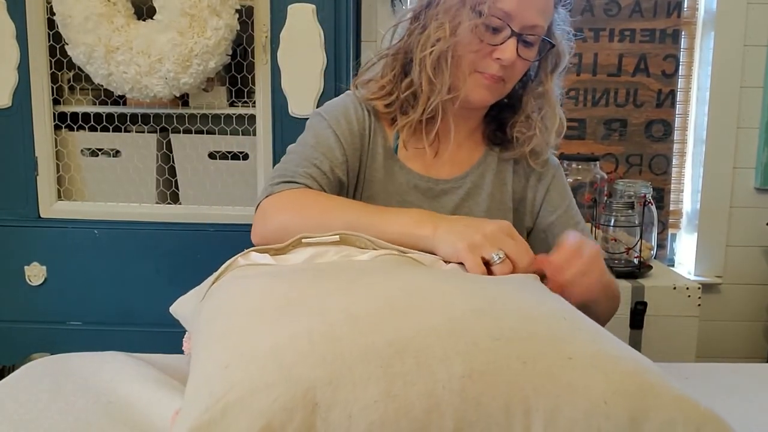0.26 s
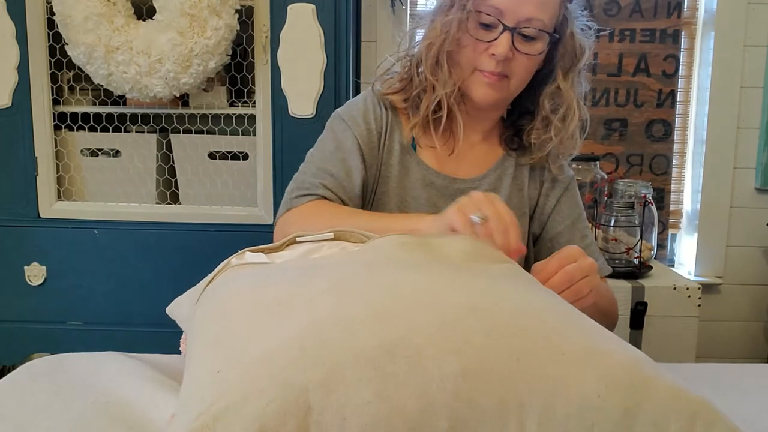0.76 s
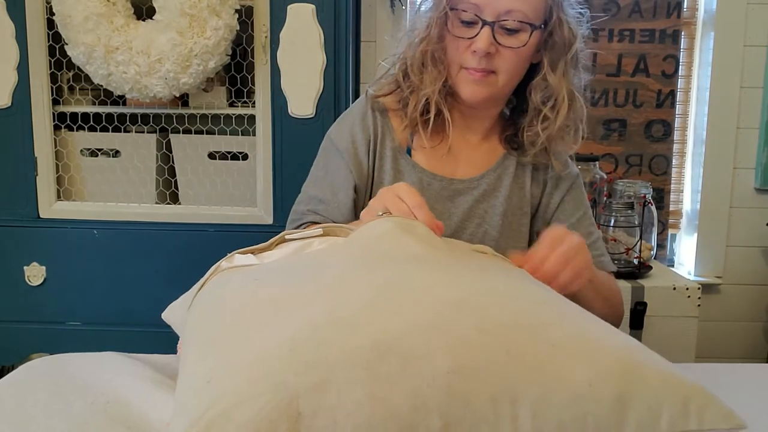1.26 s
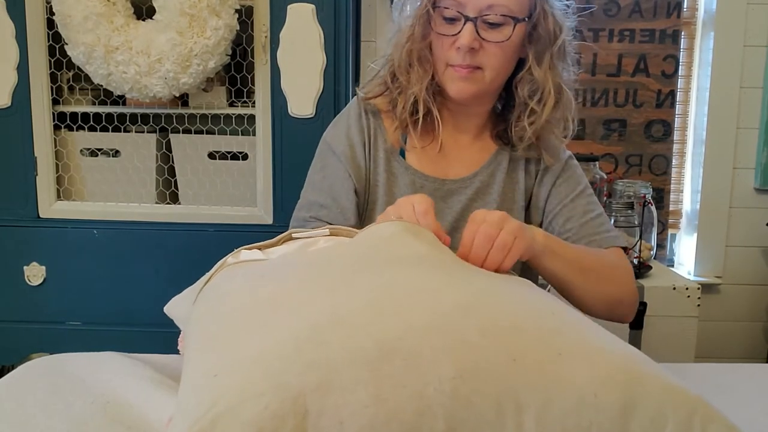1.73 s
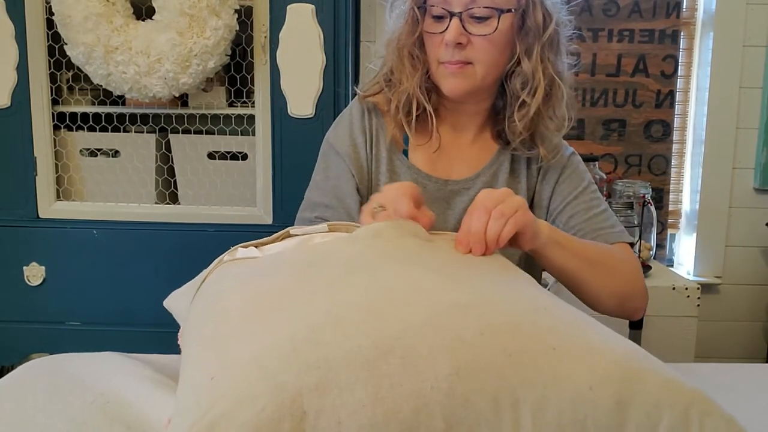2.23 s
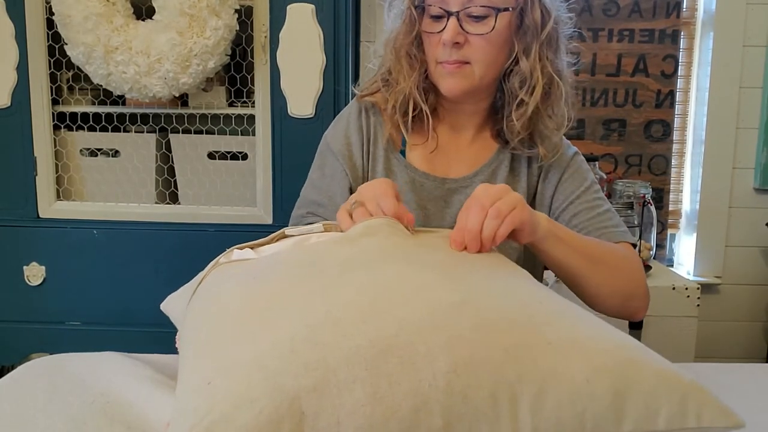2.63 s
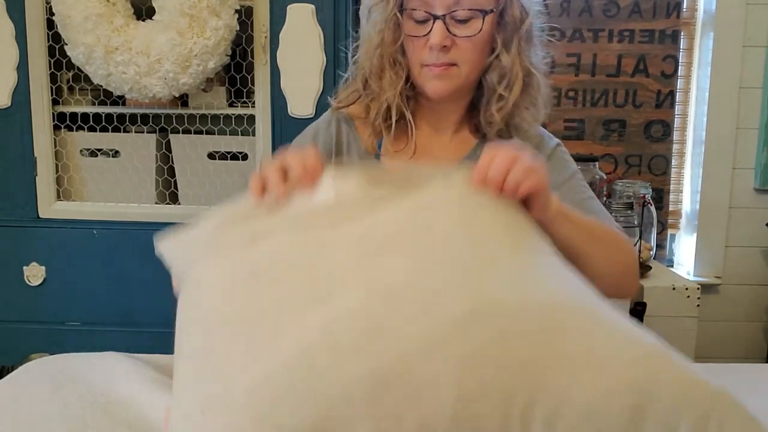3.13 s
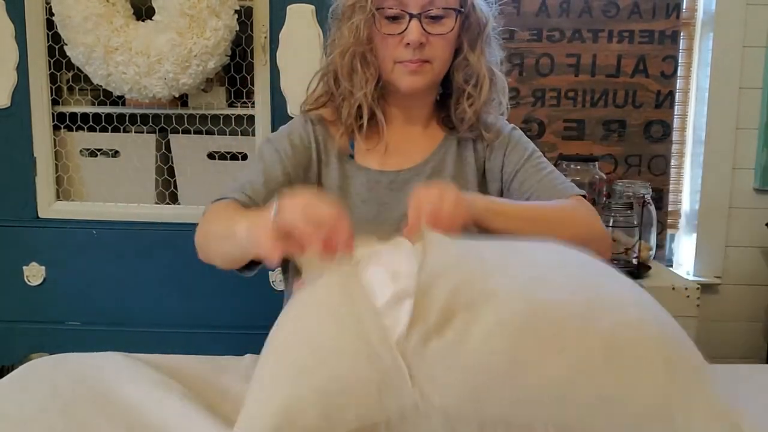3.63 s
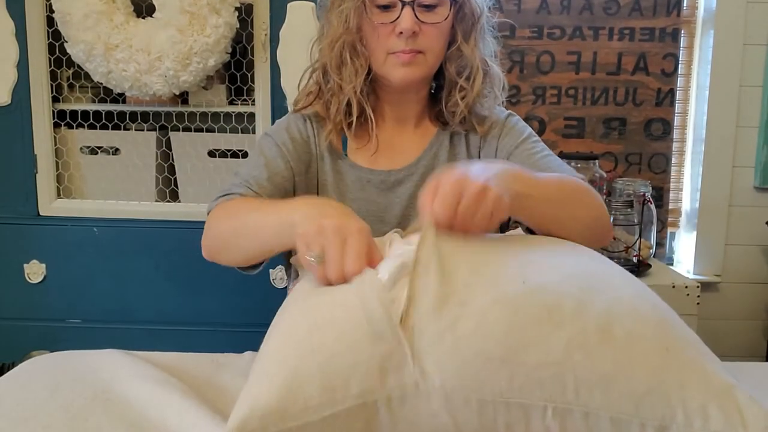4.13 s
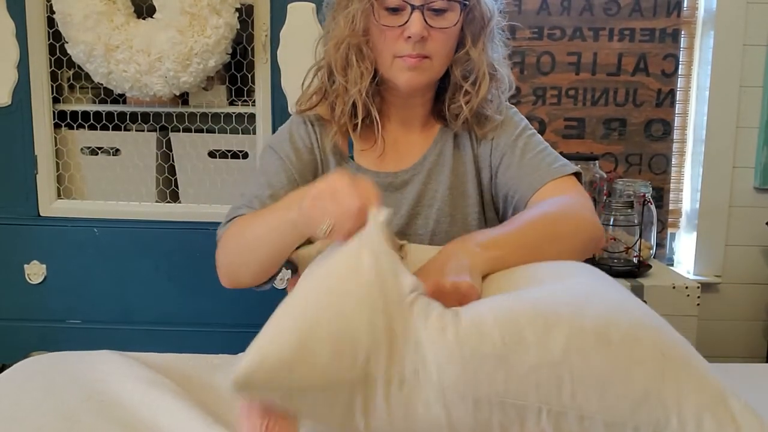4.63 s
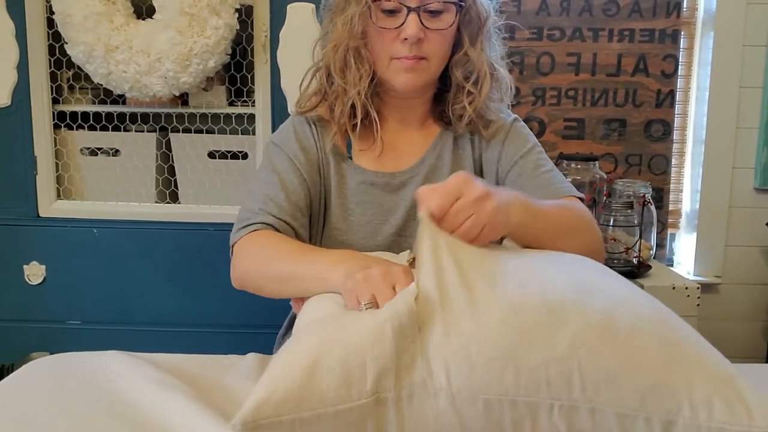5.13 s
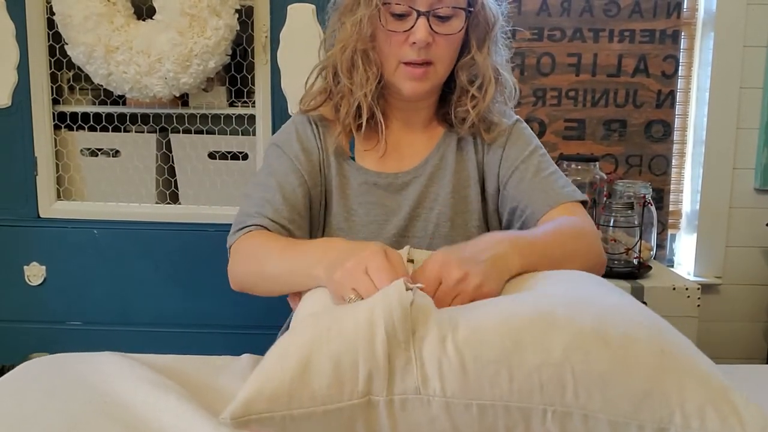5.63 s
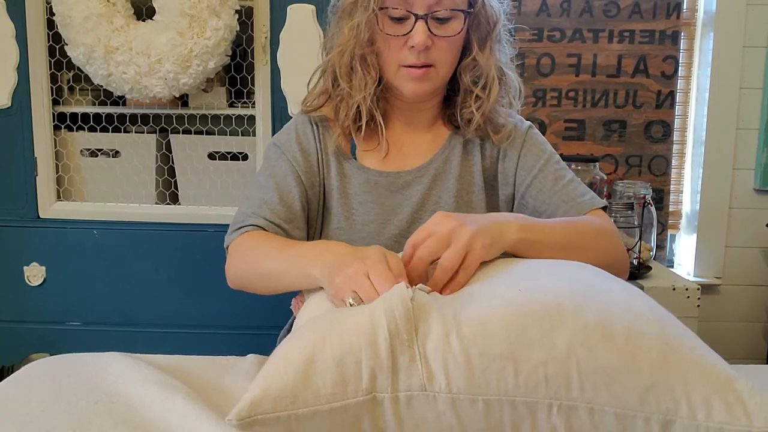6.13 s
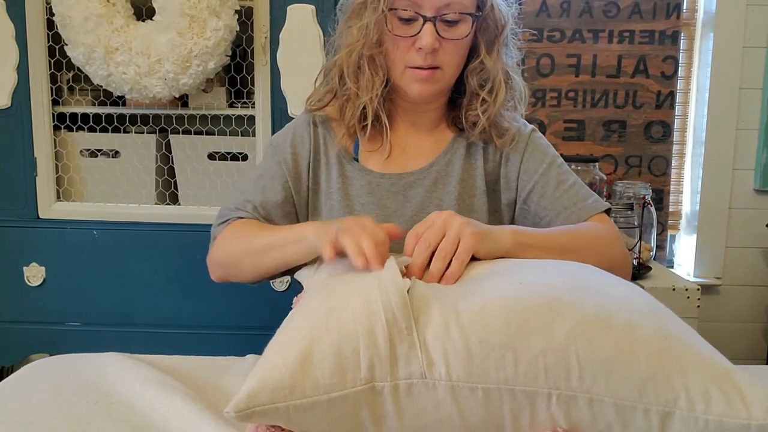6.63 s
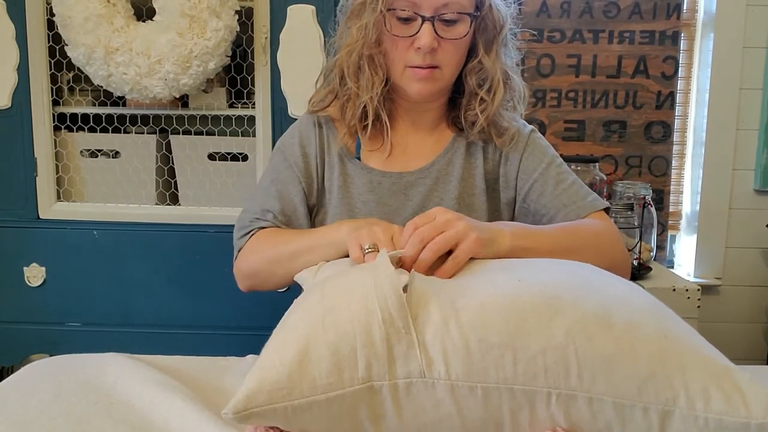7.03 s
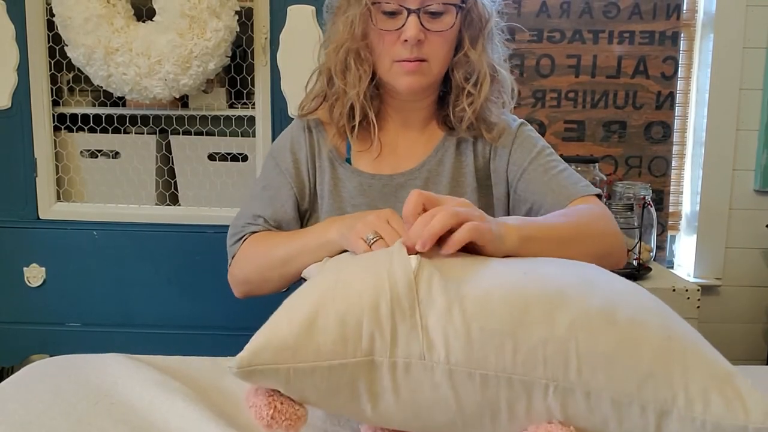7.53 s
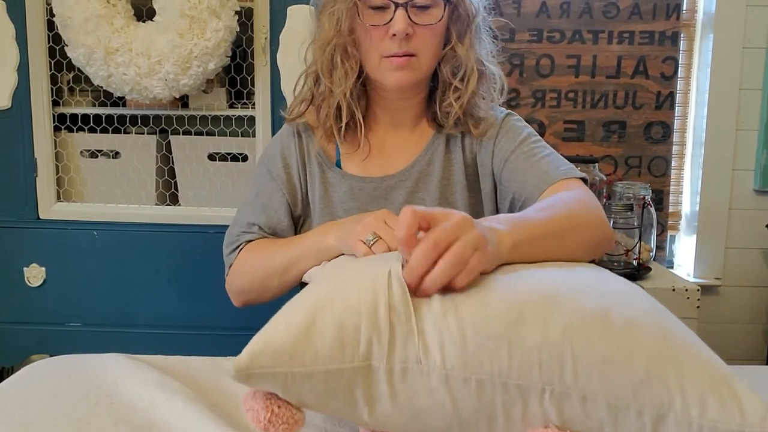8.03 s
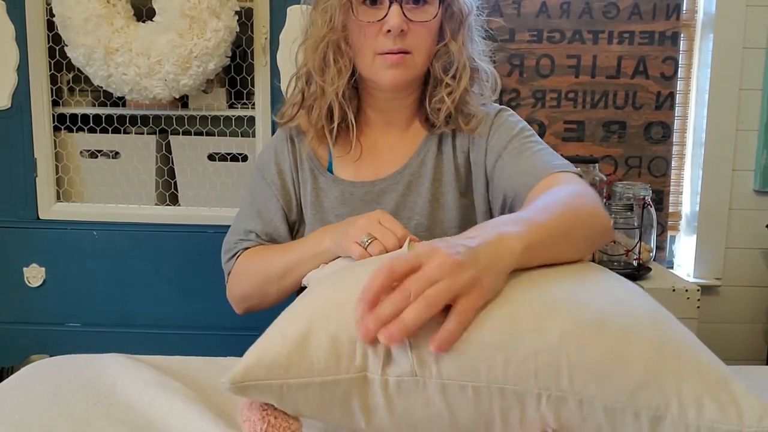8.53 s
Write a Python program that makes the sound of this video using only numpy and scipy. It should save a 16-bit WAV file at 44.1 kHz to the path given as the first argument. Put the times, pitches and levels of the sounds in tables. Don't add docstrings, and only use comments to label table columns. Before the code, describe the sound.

A quick zip, a slower bumpy pull, a brief tug and a stuttering pull sound through padded cloth. The pillow is turned and dropped with a dull table boom, then rustled, patted and fiddled with, the pull tab clicking lightly. A fast bright zip and two shorter ones finish it, with a sharp soft thump among them. Close stereo pickup, small room, low motor hum.

```python
import sys
import numpy as np
from scipy import signal
from scipy.fft import rfft, irfft, next_fast_len
from scipy.io import wavfile
from scipy.ndimage import uniform_filter1d, map_coordinates

SR = 44100
rng = np.random.default_rng(int(sys.argv[2]) if len(sys.argv) > 2 else 0)


def field_ratio(decibels):
    return 10 ** (np.asarray(decibels, dtype=float) / 20)


def bounce(signal):
    frames = np.transpose(np.atleast_2d(signal))
    limited = np.clip(frames, -1, 1)
    pcm = np.round(limited * 32767).astype(np.int16)
    wavfile.write(sys.argv[1], SR, pcm)


N = 386316
T = np.arange(N) / SR

# (time [s], peak level [dB], frequency [Hz], t60 [s])
PAT_EVENTS = [(0.211, -48, 107.8, 0.0469), (0.464, -44.5, 211.9, 0.0669), (2.619, -44.5, 106.7, 0.1031),
              (2.732, -50, 287, 0.1187), (3.496, -44, 117.7, 0.1145), (4.221, -41, 198.5, 0.1174),
              (4.614, -35, 465.8, 0.0852), (4.624, -30, 86.07, 0.1085), (4.942, -34.5, 449.8, 0.06935),
              (5.069, -40.5, 421, 0.08096), (5.249, -40, 169.7, 0.0984), (5.379, -43.5, 160.3, 0.0783),
              (5.549, -50, 396.9, 0.0769), (5.719, -53.5, 96.7, 0.0833), (5.913, -39, 208.6, 0.0438),
              (6.069, -44.5, 195, 0.0535), (6.145, -38, 187.8, 0.07714), (6.572, -41, 270.7, 0.0888),
              (6.841, -40.5, 117.5, 0.0902), (6.939, -36.5, 296.7, 0.08035), (7.654, -21, 336.1, 0.0524),
              (8.01, -38.5, 297.6, 0.07738), (8.427, -44, 480, .05), (8.574, -42, 260, .05),
              (8.644, -38, 330, .04), (8.669, -28.5, 201.3, 0.0952)]


def unit(x):
    return x / np.sqrt(np.mean(x ** 2) + 1e-20)


def along(points, hz):
    f, v = np.transpose(points)
    return np.interp(np.log(hz + 1), np.log(f + 1), v)


def curves(rows):
    s, *cols = np.transpose(rows)
    return [np.interp(T, s, c) for c in cols]


def wobble(rate_hz):
    return map_coordinates(rng.standard_normal(int(N * rate_hz / SR) + 4), [T * rate_hz])


def swell(start_s, end_s, rise_s, fall_s, level_db):
    t = T[::100, None]
    before = np.maximum(start_s - t, 0) / np.abs(rise_s)
    after = np.maximum(t - end_s, 0) / np.abs(fall_s)
    power = np.sum(field_ratio(level_db - 10 * (before + after)) ** 2, axis=1)
    return np.interp(T, t[:, 0], 10 * np.log10(power + 1e-12))


def peaks(rows):
    s, rise_s, fall_s, db = np.transpose(rows)
    return swell(s, s, rise_s, fall_s, db)


def noise():
    return rng.standard_normal((2, N))


def filtered(x, response):
    m = next_fast_len(x.shape[-1] + SR // 4)
    spectrum = rfft(x, m) * response(np.fft.rfftfreq(m, 1 / SR))
    return irfft(spectrum, m)[..., :x.shape[-1]]


def resonance(f, centre_hz, width_hz):
    damping = 1j * f * width_hz
    return damping / (centre_hz ** 2 - f * f + damping)


def paired(two, spectrum):
    # (frequency [Hz], left-right likeness [0-1])
    alike = [(60, 0.9336), (130, 0.9436), (290, 0.91684), (640, 0.5268), (1410, 0.16), (3100, 0.1717),
             (6820, 0.076), (15000, 0.062)]

    def mid_side(hz):
        turn = np.arccos(np.clip(along(alike, hz), -1, 1)) / 2
        return field_ratio(along(spectrum, hz)) * [np.cos(turn), np.sin(turn)]

    mid, side = filtered(two, mid_side)
    return unit(np.array([mid + side, mid - side]))


def fading(x, t60_s):
    return signal.lfilter([1], [1, -field_ratio(-60 / (SR * t60_s))], x)


def ringing(hz, width_hz):
    pole = np.exp(-2 * np.pi * width_hz / SR)
    slow = signal.lfilter([1], [1, -2 * pole, pole ** 2], noise() + 1j * noise())
    return unit(np.real(slow * np.exp(2j * np.pi * np.cumsum(hz) / SR)))


def room(x):
    # (frequency [Hz], t60 [s])
    decay = [(100, 0.23382), (1000, 0.29613), (5000, 0.24915), (15000, 0.05097)]
    hz, t, z = signal.stft(rng.standard_normal((2, SR // 2)), SR, nperseg=256)
    tail = signal.istft(z * field_ratio(-60 * t / along(decay, hz)[:, None]), SR, nperseg=256)[1]
    tail = paired(tail, [(20, 0), (20000, 0.00205)])
    late = np.pad(x, ((0, 0), (130, 0)))
    return signal.fftconvolve(late, tail / np.linalg.norm(tail[0]), axes=1)[:, :N]


def background():
    # (frequency [Hz], density [dB per Hz])
    hush = [(15, -46.5), (25, -41.5), (94, 6.5), (117, 7), (161, -7.5), (384, -11), (775, -19),
            (1610, -19.5), (2610, -36), (6740, -28), (7920, -34.5), (14800, -35.5), (16000, -63.5)]
    # (frequency [Hz], width [Hz], level [dB])
    hum_lines = [(117.94, 3.42, -65.5)]
    out = field_ratio(-61.5) * paired(noise(), hush)
    for hz, width_hz, db in hum_lines:
        line = filtered(rng.standard_normal(N), lambda f: width_hz / (width_hz + 2j * (f - hz)))
        out = out + field_ratio(db) * unit(line)
    return out


def drop():
    # (frequency [Hz], level [dB], t60 [s], rise [s])
    drop_modes = [
        (58.721, -12.5, 0.43803, 0.0516),
        (99.3, -19, 0.1054, 0.003533),
        (190.89, -22, 0.1405, 0.002534),
        (404.93, -35.5, 0.5532, 0.02906),
    ]
    t = np.maximum(T - 3.6165, 0)
    out = np.zeros(N)
    for k, (hz, db, t60_s, rise_s) in enumerate(drop_modes):
        envelope = field_ratio(db - 60 * t / t60_s) * (1 - np.exp(-t / rise_s))
        out += (-1) ** k * envelope * np.sin(2 * np.pi * hz * t)
    return out


def crush():
    # (peak time [s], rise [s per 10 dB], fall [s per 10 dB], level [dB])
    crunches = [
        (3.636, 0.00778, 0.0198, -41),
        (3.672, 0.02198, 0.0476, -39.5),
        (3.726, 0.00927, 0.027, -45.5),
        (3.816, 0.01526, 0.025, -52.5),
    ]
    # (frequency [Hz], density [dB per Hz])
    colour = [(250, -27.5), (500, 2), (1400, -7.5), (2600, -16), (5000, -38)]
    grains_per_s = 500
    grains = (rng.random(N) < grains_per_s / SR) * field_ratio(4.737 * rng.standard_normal(N))
    return field_ratio(peaks(crunches)) * unit(1.5 + fading(grains, t60_s=0.008335)) * paired(noise(), colour)


def hands():
    # (peak time [s], rise [s per 10 dB], fall [s per 10 dB], level [dB])
    rubs = [(0, .02, 0.0404, -62), (.47, 0.08785, 0.7881, -60), (1.14, .2, 0.1408, -63.5),
            (1.5, 0.03434, 0.174, -64), (1.96, 0.3725, 0.1185, -61), (2.2, 0.07984, 0.1349, -59),
            (2.4, 0.1956, -0.0006, -66), (2.82, 0.11152, -0.4515, -58), (3, 0.07, 0.1695, -58),
            (3.16, 0.0795, 0.0463, -47), (3.36, 0.2255, -0.4723, -58.5), (3.59, 0.2077, -0.4786, -59),
            (3.65, 0.02407, 0.0743, -43.5), (3.97, 0.02895, 0.5032, -53), (4.17, 0.09225, 0.1263, -51.5),
            (4.38, 0.05715, 0.0633, -46.5), (4.617, 0.009436, 0.0595, -40.5), (4.57, 0.1406, 0.039, -53),
            (4.74, 0.193, -0.3605, -56), (5, 0.3275, 0.2724, -50), (5.36, 0.07397, 0.079, -50),
            (5.67, 0.15915, 0.2539, -53.5), (6.27, 0.18707, 0.0903, -54.5), (6.58, 0.1033, .5, -59),
            (6.99, 0.09715, 0.0359, -56.5), (7.38, 0.329, 0.0643, -59), (7.9, 0.2193, -0.2826, -62),
            (8.09, 0.15035, 0.2329, -55), (8.55, 0.07708, -5.5668, -53), (8.67, 0.07834, 0.12, -45)]
    shifts = [(.6, 0.161, 0.2519, -55.5), (1.25, 0.192, 0.123, -62.5), (1.47, 0.03991, -0.8178, -64.5),
              (1.88, 0.0537, -0.7624, -57.5), (2.38, 0.1569, 0.1623, -53.5), (2.82, 0.1566, 0.1193, -57),
              (2.97, 0.0718, 0.5, -63), (3.32, 0.04655, 0.0192, -59.5), (3.62, 0.005035, 0.1057, -32),
              (4.04, 0.04147, 0.1208, -53), (4.19, 0.053, -0.0107, -57), (4.38, 0.03386, 0.1083, -48),
              (4.68, 0.0644, 0.1156, -53), (5.02, 0.04756, 0.0905, -54.5), (5.27, 0.01817, 0.1445, -51.5),
              (5.74, 0.16175, 0.0519, -50.5), (6, 0.0699, 0.0205, -52), (6.24, 0.0922, 0.5939, -60.5),
              (6.73, 0.09948, 0.2581, -56), (6.99, 0.04515, 0.1224, -47.5), (7.58, 0.01219, 0.2741, -49.5),
              (7.93, 0.1074, 0.1018, -55), (8.44, 0.028, -2.5341, -54), (8.6, 0.03506, 1.07, -50)]
    leans = [(.7, 0.0397, 0.345, -54.5), (.95, .1, 0.1252, -49.5), (1.08, 0.1007, 0.0524, -52.5),
             (2.3, 0.2105, 0.15063, -61), (3.62, 0.0557, 0.202, -53.5), (3.85, 0.307, 0.0458, -55),
             (4.64, 0.02593, 0.0463, -51.5), (4.8, 0.0466, 0.0815, -56.5), (5.07, 0.108, 0.0853, -51.5),
             (5.33, 0.1006, 0.327, -56), (5.74, 0.05187, 0.074, -49), (7.1, 0.0508, 0.29928, -59.5),
             (7.76, 0.10084, 0.11575, -54.5), (8.15, 0.02177, 0.1013, -56), (8.28, 0.053027, 0.05917, -52),
             (8.68, 0.061084, 0.2014, -51)]
    drags = [(8.43, .01, .15, -62), (8.6, .07, .08, -50), (8.68, .04, .1, -47), (4.5, .15, .15, -58)]
    # (time [s], half length [s], level change [dB])
    lifts = [(1.409, 0.0775, -18), (1.709, 0.0283, -4), (2.562, 0.0462, -11), (3.875, 0.03844, -17.5)]
    # (frequency [Hz], density [dB per Hz])
    weave = [(290, -28.5), (500, -4), (698, -9.5), (750, -10), (946, -7.5), (2810, -10), (7000, -12.5),
             (8450, -16.5), (13800, -17.5), (16000, -22)]
    creases = [(1100, -18.5), (2500, -2), (5200, -17)]
    stuffing = [(76, -24.5), (130, 9), (145, -7), (189, 2.5), (460, -0.5), (761, -9), (1200, -20.5),
                (1700, -23), (2640, -120)]
    table = [(25, -13), (59, 19.5), (90, 16.5), (150, -46)]

    rub_db = peaks(rubs)
    for s, half_s, db in lifts:
        rub_db = rub_db + db * np.exp(-((T - s) / half_s) ** 2)
    settle_s, pat_top_db, pat_rustle_db = 0.0712, -39, -13
    patted = [(s, .005, settle_s, min(db, pat_top_db) + pat_rustle_db) for s, db, _, _ in PAT_EVENTS]
    rustle_level = np.hypot(field_ratio(peaks(shifts + patted)), field_ratio(rub_db - 7.5))
    rumble_level = np.hypot(field_ratio(peaks(leans)), field_ratio(rub_db - 13.5 + 3.5 * wobble(14)))

    slips_per_s = 150
    slips = (rng.random(N) < slips_per_s / SR) * field_ratio(4.357 * rng.standard_normal(N))
    grain = unit(1 + .5 * fading(slips, t60_s=0.007145))
    rub = field_ratio(rub_db + 1.2436 * wobble(30)) * grain * paired(noise(), weave)
    fold_level = np.hypot(field_ratio(rub_db - 13 + 2.9 * wobble(9.7)), field_ratio(peaks(drags)))
    folds = fold_level * grain * paired(noise(), creases)
    rustle = rustle_level * field_ratio(3.114 * wobble(35)) * paired(noise(), stuffing)
    return rub + folds + rustle + rumble_level * paired(noise(), table)


def jolt(pulses, dull_hz=1250, thin_hz=110):
    # (frequency [Hz], width [Hz], level [dB])
    pillow = [(182.32, 57.19, 6.5), (348.45, 207.75, 6), (670.4, 255.28, 3.5), (1112.4, 477.7, -4.5)]

    def response(f):
        modes = sum((-1) ** k * field_ratio(db) * resonance(f, hz, width_hz)
                    for k, (hz, width_hz, db) in enumerate(pillow))
        return modes / (1 + 1j * f / dull_hz) ** 2 * (1j * f / (thin_hz + 1j * f)) ** 2

    return filtered(pulses, response)


def pats():
    out, t = np.zeros(N + SR), T[:SR // 4]
    puff = unit(jolt(rng.standard_normal(N + SR)))
    attack = 1 - np.exp(-t / 0.000621)
    for s, db, hz, t60_s in PAT_EVENTS:
        at = round(s * SR)
        push = np.sin(2 * np.pi * hz * t) + .35 * puff[at:at + len(t)]
        out[at:at + len(t)] += field_ratio(db - 60 * t / max(t60_s, .01)) * attack * push
    return out[:N]


def tab():
    # (time [s], peak level [dB], centre [Hz])
    clicks = [(0.4694, -59, 3596), (0.5896, -63, 2593), (1.0566, -37.5, 1703), (1.099, -44, 5461),
              (1.4875, -48, 1606), (3.504, -47.5, 1500), (6.943, -46, 1297), (2.6567, -48.5, 6105),
              (3.615, -35.5, 1396), (4.2129, -39.5, 2397), (2.8038, -49, 3288), (3.802, -44.5, 4206),
              (4.048, -35, 3024), (4.338, -42, 6663), (4.375, -34, 4048), (4.4084, -32.5, 4733),
              (4.5339, -40, 4571), (4.556, -40.5, 4688), (4.572, -37.5, 4787), (4.581, -42, 6670),
              (5.4884, -44.5, 3280), (5.558, -46, 5882), (6.2443, -43.5, 6756), (6.9875, -39, 4836),
              (7.9834, -37.5, 2931), (8.423, -46.5, 3270), (8.5212, -44.5, 2700)]
    t60_s = .0035
    out, t = np.zeros((2, N + SR)), T[:400]
    for s, db, hz in clicks:
        at = round(s * SR)
        ring = np.sin(2 * np.pi * hz * t) + 0.6686 * rng.standard_normal((2, len(t)))
        out[:, at:at + len(t)] += field_ratio(db + 6 - 60 * t / t60_s) * ring
    return out[:, :N]


def thud(pulses):
    centre_hz, width_hz, dull_hz = 430, 240, 1400
    return filtered(pulses, lambda f: resonance(f, centre_hz, width_hz) / (1 + 1j * f / dull_hz) ** 2)


def zipper():
    # (time [s], rate [teeth per s], pull level [dB])
    early = [
        [(.676, 110, -42), (.712, 225.44, -33), (.745, 300, -36), (.775, 717.93, -27), (.93, 773.7, -30.5),
         (.957, 409.3, -32.5), (.985, 403.9, -29), (1.01, 354.96, -41.5), (1.125, 162.76, -50)],
        [(1.49, 274.4, -44.5), (1.52, 270.5, -37.5), (1.555, 248.18, -42.5), (1.575, 241.5, -35),
         (1.6, 227.84, -43), (1.64, 196.1, -47.5), (1.68, 177.39, -64)],
        [(1.73, 297.34, -56), (1.752, 400, -46), (1.765, 560, -41), (1.79, 560, -43), (1.83, 400, -60)],
        [(2.149, 429.7, -41), (2.175, 535.4, -33), (2.2, 399.87, -36), (2.24, 227.05, -39.5),
         (2.262, 215, -43.5), (2.276, 223.1, -31), (2.335, 252.3, -37.5), (2.39, 307.8, -49.5)],
    ]
    late = [
        [(7.071, 300, -34), (7.105, 340, -31), (7.14, 450, -29), (7.163, 600.3, -26.5), (7.195, 679.2, -28.5),
         (7.23, 734, -26.5), (7.252, 680.1, -29), (7.26, 300.1, -30), (7.305, 319.9, -38.5), (7.39, 200.1, -60)],
        [(7.57, 219.4, -57), (7.612, 279.7, -44), (7.64, 349.1, -38), (7.68, 369.7, -37), (7.755, 325.4, -30),
         (7.8, 275, -41.5), (7.84, 245.4, -40), (7.92, 180, -58.5)],
        [(8.133, 184.9, -40), (8.179, 320.7, -35), (8.21, 397.7, -38), (8.235, 454.9, -27.5),
         (8.27, 403.5, -46), (8.34, 379.3, -58.5)],
    ]
    scatter = [.24, .3, .3, .2, .09, .14, .16]
    # (from [s], to [s], rise [s per 10 dB], fall [s per 10 dB], tick level [dB])
    rasps = [(0.773, 0.993, 0.0299, 0.0477, -33.5), (1.508, 1.6, 0.0097, 0.0125, -55.5),
             (1.763, 1.781, 0.0076, -1.4141, -53.5), (2.163, 2.197, 0.01691, 0.1, -36),
             (2.276, 2.32, 0.00992, -0.25, -53), (7.093, 7.259, 0.01645, 0.0347, -34.5),
             (7.675, 7.77, 0.03214, 0.0519, -40), (8.166, 8.245, 0.03535, -0.0636, -40.5)]
    # (time [s], jolt peak [dB], tick minus jolt [dB])
    snags = [(0.673, -35, -26), (0.681, -32, -25), (0.694, -31, -24), (0.703, -28, -23), (1.502, -27, -22),
             (1.514, -28, -23), (1.54, -34, -20), (1.592, -27, -28), (1.603, -27, -27), (1.637, -34, -30),
             (1.759, -39, -14), (2.229, -24, -15), (2.249, -27, -20), (2.27, -22, -18), (2.28, -23, -17),
             (2.287, -23, -18), (2.296, -23, -18), (2.305, -21, -17), (2.317, -22, -17), (2.327, -22, -17),
             (2.393, -28, -21), (2.446, -31, -23), (7.572, -40, -30), (7.596, -36, -30), (7.66, -23, -23),
             (8.133, -32, -14), (8.2275, -23, -22), (8.2305, -23, -24), (8.236, -22, -24),
             (8.2385, -25, -24), (8.2435, -21, -22), (8.677, -26, -17)]
    more_snags = [(0.7443, -33, -18.5), (.7505, -32, -18.5), (.7625, -29, -17), (.776, -30, -14),
                  (1.506, -39, -18), (2.204, -29, -13), (2.21, -28, -13), (2.238, -29, -19)]
    # (time [s], upper ring [Hz], upper over tick [dB], lower ring [Hz], lower over tick [dB])
    grip = [(.7, 3700, -4, 1800, -15.5), (.79, 3900, -2, 1800, -9), (.9, 3400, 0, 2100, -7),
            (.99, 3800, 0, 1700, -8), (1.06, 3550, -4, 1700, -7.5), (1.5, 3700, -12, 1900, 2),
            (1.64, 3700, -10.5, 1700, 2), (1.76, 3800, -13, 1300, 3), (1.785, 3800, -10, 1900, 3),
            (1.82, 3800, -20, 1300, 0), (2.15, 4100, -6, 1500, -8), (2.2, 3900, -1, 1500, -5),
            (2.25, 3760, -6.5, 1400, -3), (2.4, 3800, -7.5, 1500, -5), (7.07, 4600, -1, 2300, -18),
            (7.11, 4700, 0, 2300, -7), (7.16, 4200, -8.5, 1900, -2), (7.19, 4300, -3, 1700, 0),
            (7.24, 3300, -4, 2000, -1), (7.3, 3400, -4, 2000, -1), (7.62, 3800, -10, 1300, 2),
            (7.66, 3700, -8, 1500, 4), (7.69, 3700, -7, 1300, -3), (7.74, 4100, -4, 1300, 0),
            (7.77, 3600, -6, 1900, 0), (7.85, 3900, -6, 1300, -3), (8.14, 3000, -6, 1300, -4),
            (8.2, 3900, -5, 1400, 0), (8.215, 4300, -5, 2300, -2), (8.25, 4300, -5, 2400, -2),
            (8.28, 3650, -8.5, 1400, -11)]
    # (frequency [Hz], density [dB per Hz])
    slider = [(530, -20.5), (900, -1), (1340, -7), (1950, -5.5), (2500, -10), (3960, -12), (5160, -13),
              (6560, -13.5), (7960, -19.5), (14400, -18.5), (16000, -37.5)]
    # (frequency [Hz], width [Hz], level [dB])
    snap_modes = [(1900, 1700, 0.5), (5200, 4670, -12)]

    strokes = early + late
    rate, jolt_db = curves(np.concatenate(strokes))
    which = np.searchsorted([s[-1][0] for s in strokes[:-1]], T)
    steady_db, slack_per_db = -38, 0.1608
    slack = slack_per_db * np.maximum(steady_db - jolt_db, 0)
    uneven = np.clip(np.take(scatter, which) + slack, 0, .6)
    loose_tick_db = -21.5
    tick_db = np.maximum(swell(*np.transpose(rasps)) - jolt_db, loose_tick_db)
    upper_hz, upper_db, lower_hz, lower_db = curves(grip)
    drift = 1 + .05 * wobble(25)
    moving = sum((T > s[0][0] - .002) & (T <= s[-1][0]) for s in strokes) > 0
    jolt_db = jolt_db - 60 * (1 - uniform_filter1d(moving * 1., size=90))

    count = np.cumsum(rate) / SR + uneven * wobble(400)
    at = np.flatnonzero(np.diff(np.floor(np.maximum.accumulate(count))) > 0)
    side_db = 1.0454 * (-1) ** np.arange(len(at))
    spread_db = (2.0 + 3.161 * uneven[at]) * np.clip(rng.standard_normal(N)[at], -3, 1.4)
    teeth = np.zeros(N)
    teeth[at] = field_ratio(side_db + spread_db) * np.sqrt(SR / rate[at])

    thud_peak = np.abs(thud(signal.unit_impulse(SR))).max()
    forced, forced_tick = np.zeros((2, N))
    for s, db, rel_db in snags + more_snags:
        forced[round((s + .0025) * SR)] = field_ratio(db + 2.5) / thud_peak
        forced_tick[round((s + .002) * SR)] = field_ratio(db + rel_db + 11)
    stalled = np.zeros(N, bool)
    for s, _, _ in snags:
        stalled |= abs(T - s - .0025) < .007
    free = 1 - .9 * stalled
    teeth *= free

    jolts = field_ratio(jolt_db) * unit(jolt(np.roll(teeth, 40))) + thud(forced)
    chatter = unit(fading(teeth, t60_s=.004)) + .7 * free
    gate = field_ratio(jolt_db + tick_db - 1.0) * unit(chatter) + fading(forced_tick, t60_s=0.010664)
    scrape = gate * paired(noise(), slider)
    upper = field_ratio(upper_db) * ringing(upper_hz * drift, width_hz=720)
    lower = field_ratio(lower_db) * ringing(lower_hz * drift, width_hz=600)
    ring_gate = unit(unit(fading(teeth, t60_s=.005)) + .6 * free)
    rings = field_ratio(jolt_db + tick_db) * ring_gate * (upper + lower)
    snap = filtered(forced_tick, lambda f: sum(field_ratio(db + 16) * resonance(f, hz, width_hz)
                                               for hz, width_hz, db in snap_modes))
    return jolts + scrape + rings - snap


def scene():
    near = zipper() + tab() + pats()
    near_and_room = field_ratio(-3.0) * near + field_ratio(-7.5) * room(near)
    balance = field_ratio([[.6], [-.6]])
    return balance * (near_and_room + drop() + crush() + hands() + background())


def roll_off(x):
    return signal.sosfilt(signal.butter(12, 16470, fs=SR, output="sos"), x)


def record(dry):
    top_hz = 15870
    mix = filtered(dry, lambda hz: hz < top_hz)
    return roll_off(mix)


dry = scene()
out = record(dry)
bounce(out)
```